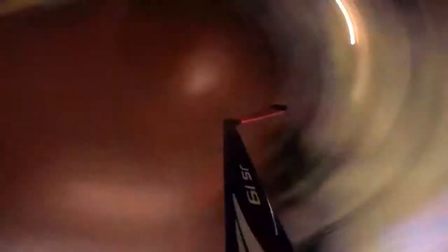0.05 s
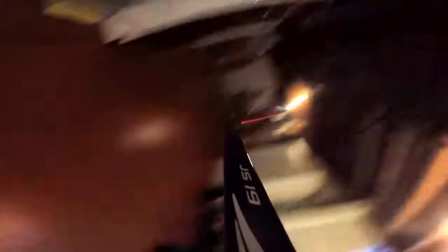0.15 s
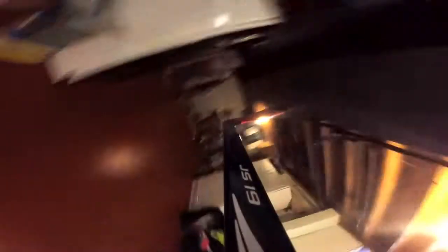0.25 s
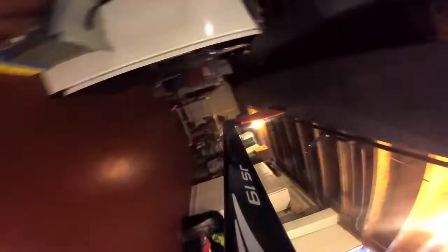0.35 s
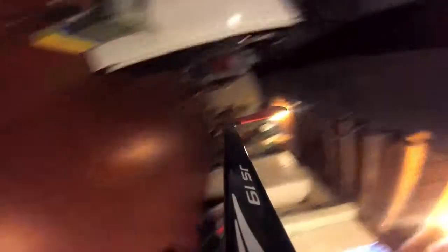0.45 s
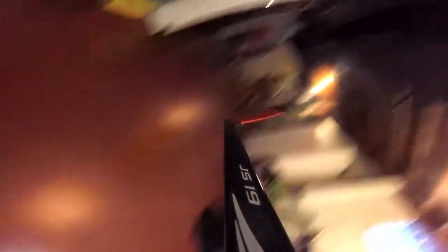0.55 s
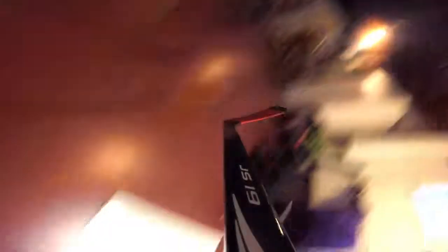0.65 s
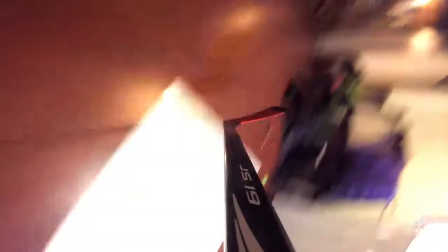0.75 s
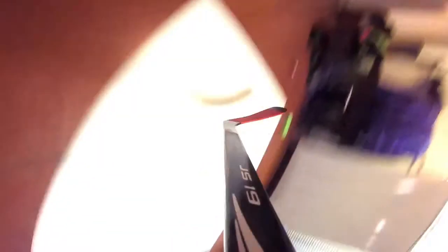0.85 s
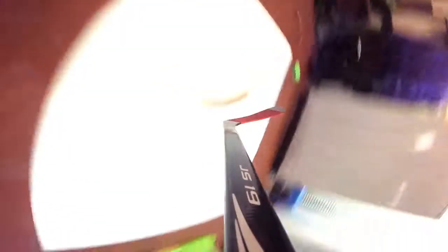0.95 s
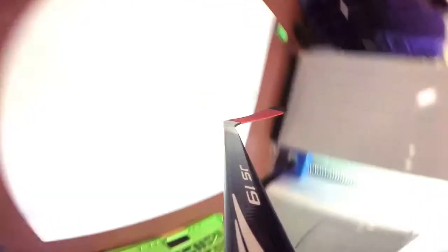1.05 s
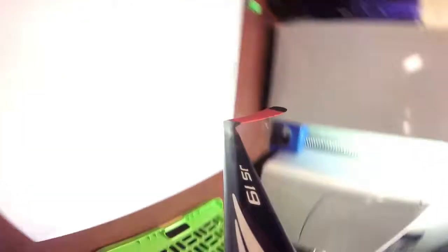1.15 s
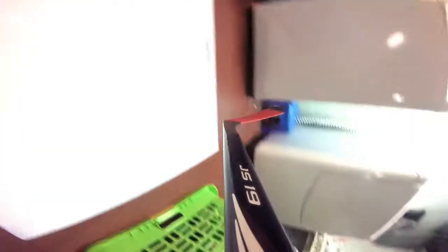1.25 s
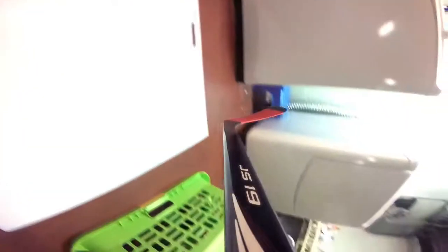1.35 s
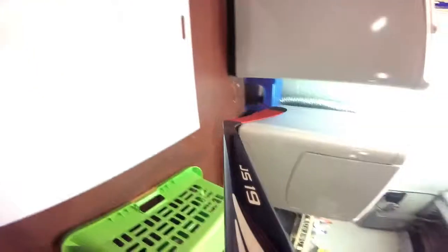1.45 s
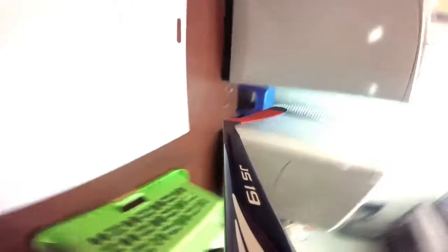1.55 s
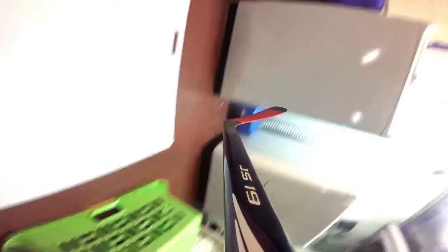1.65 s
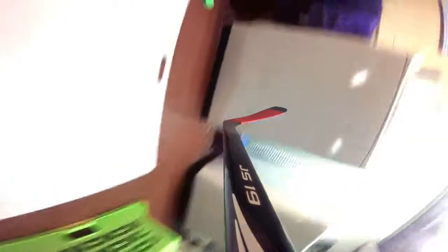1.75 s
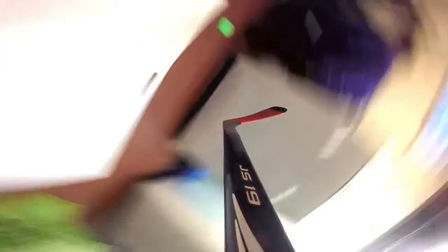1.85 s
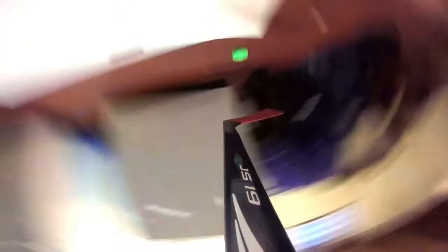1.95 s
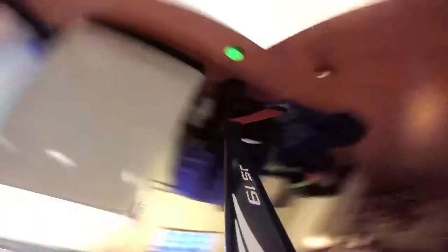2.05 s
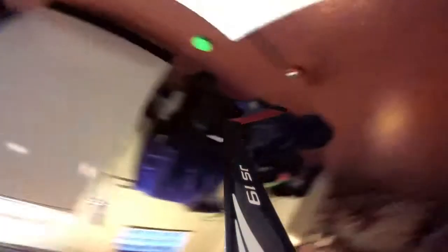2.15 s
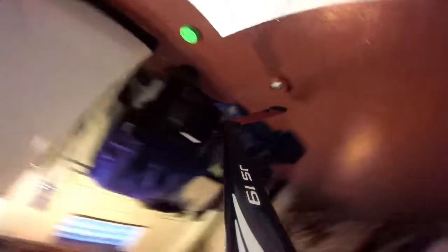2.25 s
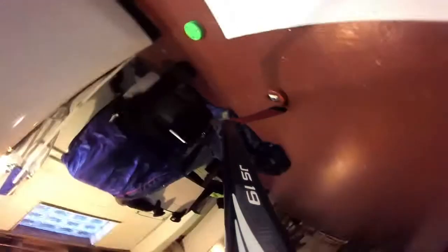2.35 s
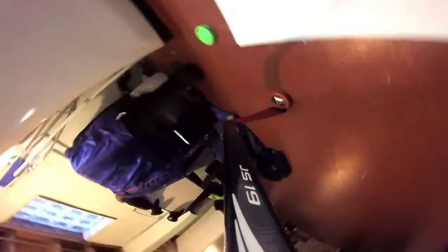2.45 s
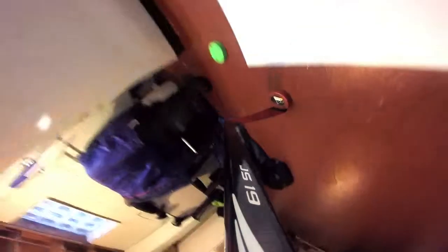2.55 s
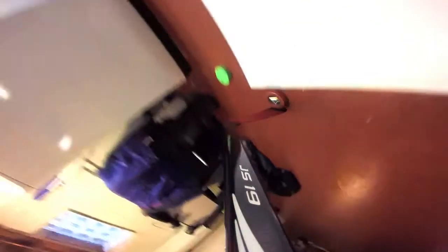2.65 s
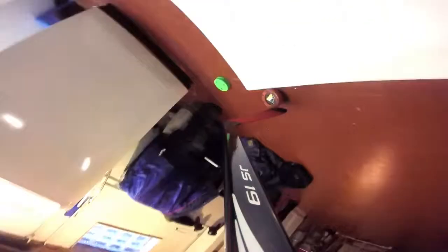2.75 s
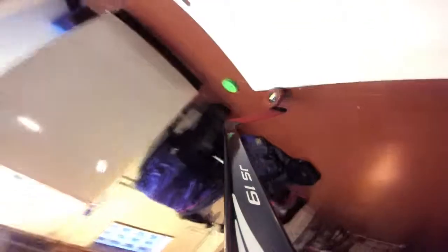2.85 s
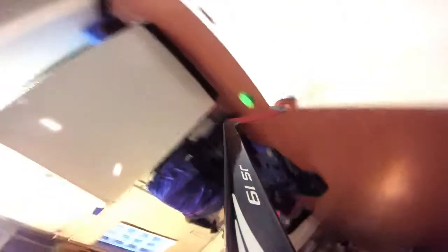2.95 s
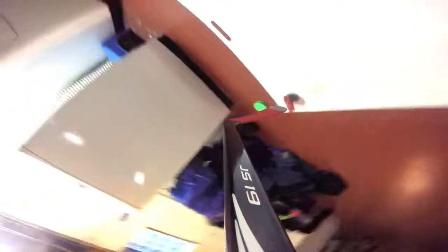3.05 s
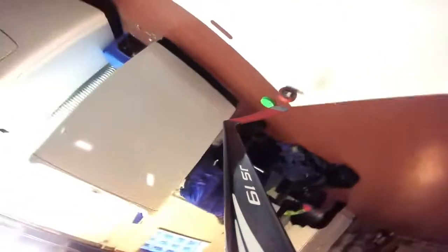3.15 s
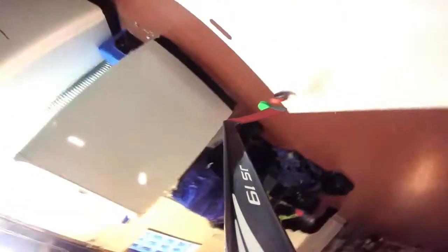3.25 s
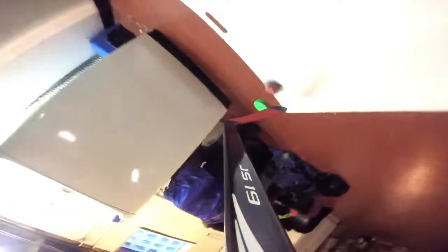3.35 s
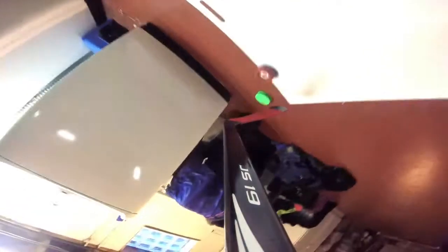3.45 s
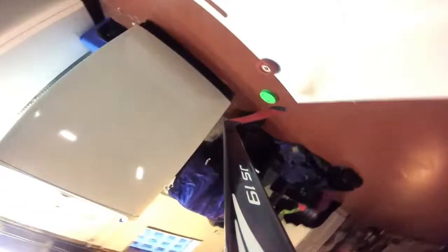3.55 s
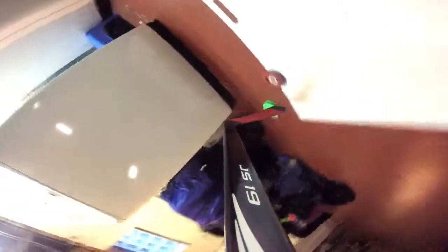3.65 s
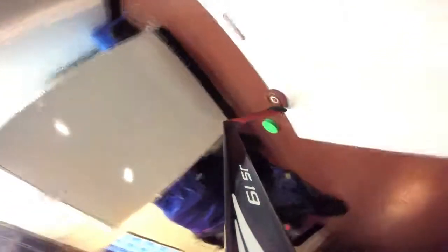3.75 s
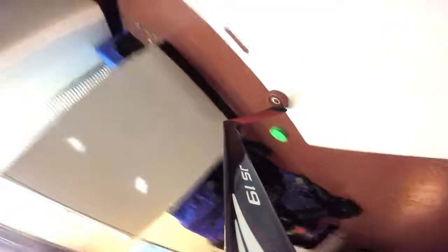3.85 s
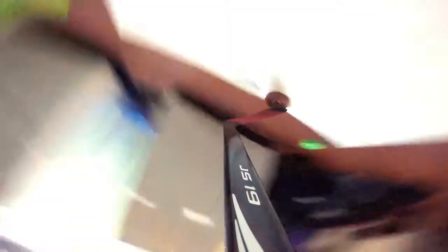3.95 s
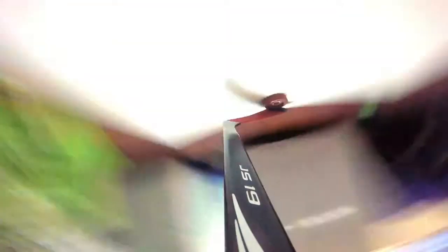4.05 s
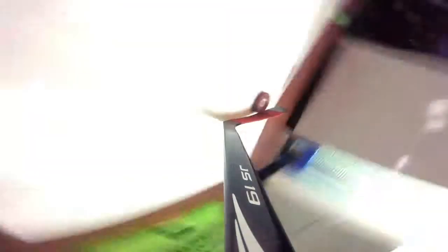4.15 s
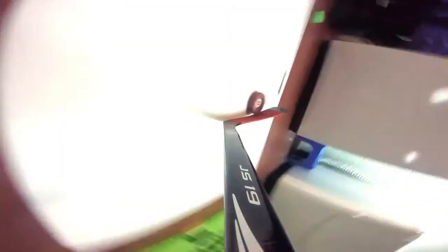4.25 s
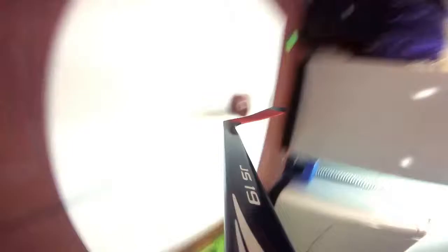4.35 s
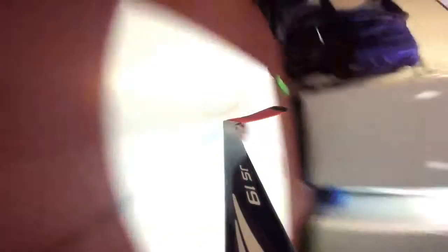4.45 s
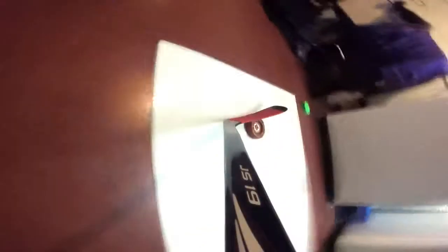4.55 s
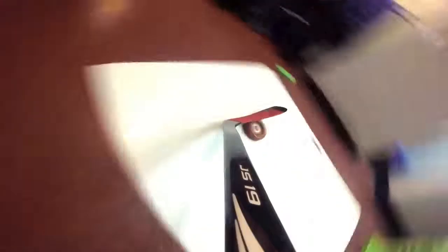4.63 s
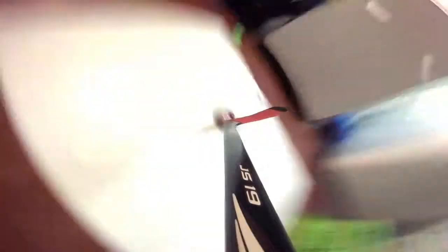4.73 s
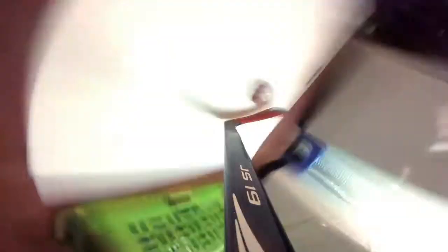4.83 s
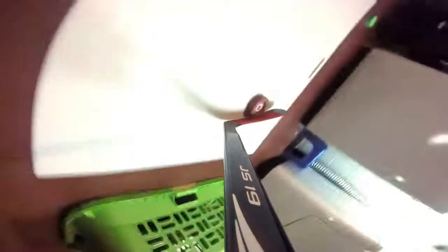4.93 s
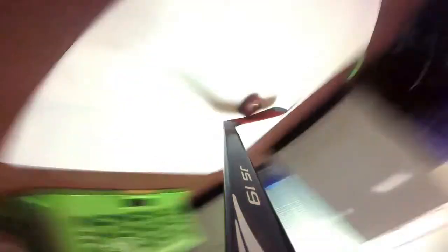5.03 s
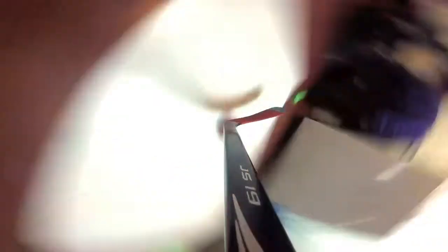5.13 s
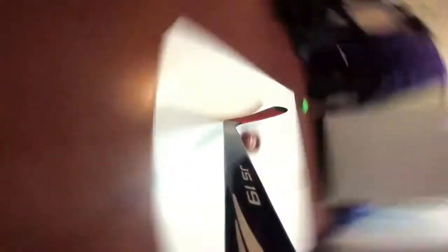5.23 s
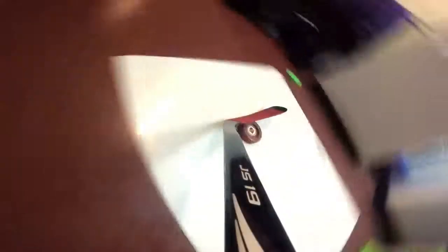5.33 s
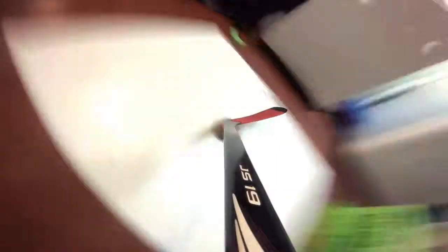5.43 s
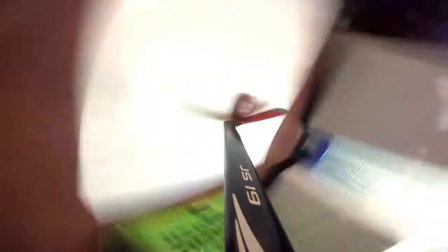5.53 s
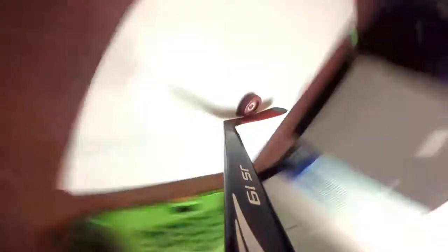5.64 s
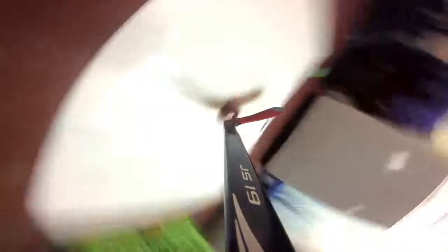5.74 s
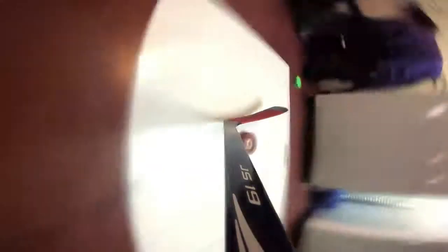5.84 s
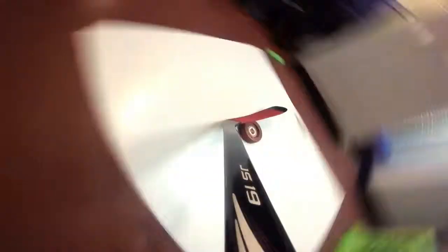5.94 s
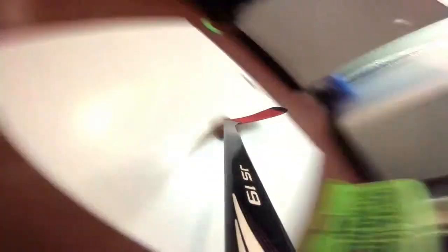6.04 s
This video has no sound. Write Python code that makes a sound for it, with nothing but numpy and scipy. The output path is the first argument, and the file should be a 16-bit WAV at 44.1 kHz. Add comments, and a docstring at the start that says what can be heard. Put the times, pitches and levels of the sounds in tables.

```python
"""A hockey stick dribbles a small hard ball on an indoor floor, heard by a microphone fixed to the shaft.
Each clack rings the blade and runs up the shaft as a bending wave; the hardest overload the microphone.
Once the blade judders along the floor, sticking and slipping. Lighter knocks ring in the room.
Underneath, the moving stick rumbles and rustles, and air buffets the microphone on the swings."""
import sys
import numpy as np
from scipy import signal
from scipy.fft import rfft, irfft
from scipy.io import wavfile

SR = 44100
rng = np.random.default_rng(int(sys.argv[2]) if len(sys.argv) > 2 else 0)


def to_wav(s):
    """Save 16-bit WAV."""
    ch = np.atleast_2d(s).T  # columns
    pcm = np.round(np.clip(ch, -1, 1) * 32767)  # PCM
    wavfile.write(sys.argv[1], SR, pcm.astype(np.int16))


N = 268569
TIME = np.arange(N) / SR
AGE = TIME[:SR // 2]  # seconds since a hit

# The blade hits ball or floor: (time [s], level [dB], place [0 heel to 1 toe], brightness [dB/octave],
# shaft thump send [dB], accent pitch [Hz], accent send [dB])
HITS = [(0.0015, -15, 1, 1.5, -15.5, 780, 3), (0.0095, -21, 0.75, 3.5, -22, 950, -3),
        (1.784, -45.5, 0.3, 6.5, -8, 950, 0), (1.834, -37, 0.6, 6, -6, 906, -4),
        (1.881, -39.5, 0.95, 0, 24, 1004, -6), (2.3496, 5.5, 0.65, 2.5, -8, 1487, -5.5),
        (2.4208, -7, 0.94, -2.5, -4.5, 1440, 1), (2.682, -2.5, 0.93, -2, -11, 1096, -6),
        (3.7519, 2, 0.55, -1, 2, 3040, -5.5), (3.785, -12.5, 0.71, -2.5, -0.5, 920, -5.5),
        (3.8371, -18.5, 0.99, -1, -28, 950, 3), (3.865, -34, 0.6, 1.5, 1, 2010, 9),
        (3.882, -33.5, 0.74, 3.5, -21.5, 1970, 9), (4.058, -29.5, 0, 8.5, 9.5, 1460, 10),
        (4.089, -8, 0.62, 2, 4.5, 3140, -1.5), (4.098, -7.5, 0.56, 1, 10, 1100, -7),
        (4.137, -6.5, 0.38, -3, 10, 950, -12), (4.1609, 2.5, 0.5, -3.5, -2.5, 936, -2),
        (4.172, -15, 0, 1, -2.5, 621, 4), (4.343, -37.5, 0.83, 1, 20.5, 1090, 8.5),
        (4.4287, -32, 0.5, -6, -16.5, 1306, 5), (4.536, 8.5, 0.55, 1, -8, 1160, -13),
        (4.554, -4, 0.48, -1, -16, 850, -4), (4.692, -43.5, 0.83, -4.5, 5, 976, 0),
        (4.872, 2, 0.36, 3.5, -3, 2670, 1), (4.927, 6, 0.68, 3.5, -13, 1310, -9.5),
        (5.071, -46.5, 0.76, -4.5, 3, 900, -7), (5.227, 5.5, 0.29, 2.5, -7, 2282, -3),
        (5.3041, 1, 0.69, 4.5, -13, 827, 7), (5.441, -40.5, 0.67, -7, 18.5, 1423, 2.5),
        (5.537, -16.5, 0.58, -7, 14.5, 1344, -13.5), (5.564, -9, 0.22, -1, -19, 913, -0.5),
        (5.569, 0, 0, 3.5, -13, 2313, 2), (5.632, -35.5, 0.5, -2.5, -5, 1350, -21),
        (5.72, -50.5, 0.5, -8.5, 12.5, 912, -0.5), (5.8694, 2.5, 0.19, -0.5, -4, 1185, 0),
        (5.9263, 1, 0.73, 4.5, -19, 813, 6.5), (6.022, -37, 0.42, -3.5, 19.5, 1410, -11)]
def dribble(accent_t60=0.022, rebounds=3, first_gap_s=0.011, gap_shrink=0.8, gap_scatter=0.28):
    """Each hit rings the blade with one accented pitch and shakes the shaft; the ball rattles after it."""
    blade, shaft = np.zeros(N), np.zeros(N)
    jitters = rng.uniform(-1.1, 1, (len(HITS), rebounds))
    for (s, db, place, bright_db, thump_db, accent_hz, accent_db), jitter in zip(HITS, jitters):
        ring = 0.73 * 2 ** (-db / 25.5)  # a firm hit damps the blade; 25.5 dB softer rings twice as long
        accent = amp(accent_db) * mode(accent_hz, accent_t60 * ring)
        add(blade, s, amp(db) * (clack(place, bright_db, ring) + accent))
        add(shaft, s, amp(db + thump_db) * shaft_flex(place))
        # the ball has rolled towards the toe: dull rebounds, each softer and mostly sooner than the last
        rebound = clack(place=0.85, bright_db=bright_db - 11.5, ring=0.81)
        gaps = first_gap_s * gap_shrink ** np.arange(rebounds) * (1 + gap_scatter * jitter)
        for k, delay in enumerate(np.cumsum(gaps)):
            add(blade, s + delay, amp(db - 21.5 - 6 * k) * rebound)
    return low_cut(blade) + low_cut(shaft, hz=61)


# The tone of the clack, the blade's modes and, at 830 Hz, the ball's ring: (pitch [Hz], heel level [dB], toe
# level [dB], base t60 [s])
CLACK_MODES = [(610.6, -9, -21.5, 0.065), (830, -33, -9, 0.01), (838, -25.5, -19.5, 0.062),
               (884.4, -22, -1, 0.042), (1013, -6, -9, 0.03), (1318, -0.5, -13, 0.02),
               (1568, -4, -16.5, 0.022), (1964, -14.5, -10.5, 0.02), (2410, -9.5, -25, 0.014),
               (2877, -8, -11, 0.011), (3324, -20, -13, 0.02), (4330, -27.5, -23, 0.0088),
               (5640, -41.5, -30.5, 0.02)]
# EQ of the contact crack: (frequency [Hz], level [dB])
CRACK_EQ = [(150, -16.5), (400, -16.5), (800, -4), (1500, 7.5), (3200, -2.5), (4200, -3.5), (6500, -14),
            (7500, -18.5), (9000, -17), (11000, -32), (15000, -36.5)]
# EQ of the buzzing tail: (frequency [Hz], level [dB])
BUZZ_EQ = [(150, -7.5), (380, -18), (700, -4.5), (1200, -6.5), (2100, -5), (3200, -8.5), (4500, -11),
           (6500, -11), (10000, -24.5), (14000, -46.5)]
def clack(place, bright_db, ring, crack_t60=0.048, crack_db=-10, rise_s=0.00055):
    """Blade modes and the ball's ring, weighted by the place struck, a contact crack and a buzz; ring stretches
    the first two."""
    tone = sum(amp(heel_db + place * (toe_db - heel_db)) * tilt(hz, bright_db) * mode(hz, t60 * ring)
               for hz, heel_db, toe_db, t60 in CLACK_MODES)
    burst = amp(crack_db) * noise(CRACK_EQ, len(AGE), bright_db)
    body = signal.sosfiltfilt(signal.butter(2, 3800, fs=SR, output="sos"), burst)
    treble = amp(2) * (burst - body)
    crack = body * fade(crack_t60 * ring) + treble * fade(0.65 * crack_t60 * ring)  # treble dies first
    # the crowded upper modes leave a weak, chattering buzz
    buzz = amp(-35) * fade(t60=0.11) * chatter(len(AGE)) * noise(BUZZ_EQ, len(AGE), slope_db=-0.4)
    return amp(4) * tone + attack(rise_s) * (crack + buzz)


# The low thump, the shaft's modes: (pitch [Hz], heel level [dB], toe level [dB], t60 [s])
SHAFT_MODES = [(64, -40, -39, 0.1), (109.7, -22, -20.5, 0.11), (147, -25, -28, 0.093),
               (184.4, -21.5, -42.5, .16), (244, -29.5, -28.5, 0.087)]
def shaft_flex(place):
    """The whole shaft bends slowly after a hit at this place on the blade."""
    return sum(amp(heel_db + place * (toe_db - heel_db)) * mode(hz, t60)
               for hz, heel_db, toe_db, t60 in SHAFT_MODES)


# The blade is pushed over the floor: (start [s], end [s], level [dB])
PUSHES = [(2.393, 2.421, -25), (2.471, 2.679, -15)]
# Hard catches that punctuate the drag: (time [s], level [dB])
HARD_CATCHES = [(2.4705, -18.5), (2.4928, -11.5), (2.5255, -10.5), (2.6054, -15.5), (2.6242, -8.5),
                (2.651, -13.5)]
# EQ of the floor rasp: (frequency [Hz], level [dB])
RASP_EQ = [(88, -54.5), (150, -3), (371, -31.5), (649, -25), (742, -30), (850, -29.5), (1160, 3.5),
           (1380, -6.5), (2020, -5.5), (2360, -34), (3030, -24), (4210, -27), (5510, -54), (8410, -47.5),
           (15000, -55)]
def drag(slips_per_s=170, slip_scatter_db=4, snap_back_s=0.0055, snap_back_db=-6):
    """The blade sticks and slips: small uneven slips ring its modes and rasp, hard catches snap twice."""
    pressure = sum(amp(db) * held(start, end, rise_db_per_s=8997.5, fall_db_per_s=1499.5)
                   for start, end, db in PUSHES)
    rasp = amp(-14) * pressure * chatter(N) * noise(RASP_EQ, N)
    # each slip grips at one of six places near the toe and ticks
    ticks = [clack(place, bright_db=-1.5, ring=1.87, crack_t60=0.0096, crack_db=-3)
             for place in np.linspace(0.65, 1, 6)]
    judder = np.zeros(N)
    for start, end, db in PUSHES:
        s = start
        for gap, size, which in rng.random((80, 3)):
            if s < end:
                slip_db = db + 1 + slip_scatter_db * (2 * size - 1.5)
                add(judder, s, amp(slip_db) * ticks[int(which * len(ticks))])
            s += 2 * gap / slips_per_s
    for s, db in HARD_CATCHES:
        for delay, snap_db in (0, 0), (snap_back_s, snap_back_db):  # the bent blade snaps back
            catch = clack(place=0.7, bright_db=-2.5, ring=0.96, crack_t60=0.017, crack_db=-1)
            add(judder, s + delay, amp(db + snap_db + 3) * catch)
    return rasp + low_cut(judder)


# Light knocks and scuffs: (time [s], level [dB], brightness [dB/octave], t60 [s], room send [dB])
LIGHT_KNOCKS = [(0.926, -39.5, -3.5, 0.34, -3), (1.141, -41, -18, 0.062, 8.5), (2.925, -62, -9, 0.038, -2),
                (3.003, -56, -8, 0.17, 0.5), (3.386, -33, -5, .04, 7.5), (3.397, -25.5, -3.5, 0.067, -2.5),
                (3.498, -22, -0.5, 0.033, 4.5), (3.55, -36, -8.5, 0.056, -17.5),
                (3.573, -31.5, -5, 0.033, 4.5), (3.627, -35.5, -8, 0.05, -10), (3.989, -36, 0.5, 0.36, -26),
                (4.24, -37.5, -5.5, 0.065, -7), (4.432, -34.5, -4.5, 0.02, 7.5)]
# EQ of a knock: (frequency [Hz], level [dB])
KNOCK_EQ = [(80, -16), (350, -4.5), (600, -0.5), (900, -5.5), (1300, 1.5), (2000, 4), (2600, -1),
            (5000, -7.5), (6500, -11), (10000, -25.5), (15000, -44.5)]
def knocks(ping_hz=1875, ping_t60=0.049):
    """Rough knocks with one faint pitch, heard through the air; gives the direct sound and a room send."""
    direct, send = np.zeros(N), np.zeros(N)
    for s, db, bright_db, t60, send_db in LIGHT_KNOCKS:
        knock = amp(db) * attack(rise_s=0.0004) * fade(t60) * noise(KNOCK_EQ, len(AGE), bright_db)
        ping = amp(db - 4) * tilt(ping_hz, bright_db) * mode(ping_hz, ping_t60)
        add(direct, s, knock + ping)
        add(send, s, amp(send_db) * knock)
    return direct, send


# EQ of the reverb tail: (frequency [Hz], level [dB])
ROOM_EQ = [(100, 0), (500, 0.5), (1000, -0.5), (2100, 5), (3000, -6), (6500, -3), (12000, 10)]
def room(send, t60=0.36):
    """The short, diffuse echo of a furnished room."""
    tail = noise(ROOM_EQ, len(AGE)) * fade(t60) * attack(rise_s=0.0047)
    return signal.fftconvolve(send, tail / np.linalg.norm(tail))[:N]


# Sweeps and slow carries of the stick: (start [s], end [s], rumble [dB], rustle [dB], release [dB/s])
SWINGS = [(0, .1, -39.5, -52, 152), (.59, .66, -34, -54.5, 62), (0.914, 2.3, -58.5, -61, 97.5),
          (1.828, 1.93, -58.5, -53.5, 48), (2.376, 2.71, -48, -68, 217), (3.327, 6.089, -73, -66, 106),
          (3.52, 3.58, -72.5, -57.5, 56), (3.975, 4.2, -52.5, -54, 71.5), (4.66, 5.028, -52.5, -62.5, 155),
          (5.32, 5.694, -51.5, -64.5, 66), (5.98, 6.09, -52, -71, 100)]
# EQ of the grip and shaft rumble: (frequency [Hz], level [dB])
HANDLING_EQ = [(20, -13), (60, -2), (110, 3), (180, -3.5), (260, -10), (450, -23), (900, -34)]
# EQ of air buffeting the microphone: (frequency [Hz], level [dB])
WIND_EQ = [(12, -34.5), (20, 9), (60, 1.5), (102, -6.5), (148, -8.5), (429, -24.5), (605, -19),
           (1200, -58.5), (1560, -77.5), (2640, -120)]
# EQ of the rustle: (frequency [Hz], level [dB])
RUSTLE_EQ = [(200, 4.5), (500, 3.5), (1000, 0.5), (2100, -1), (3000, -5.5), (4500, -10), (6500, -11.5),
             (8000, -18), (12000, -25), (15000, -34.5)]
def swing(recoil_delay_s=0.08, recoil_width_s=0.012, gust_pivot_db=-36, gust_growth=1.3):
    """The moving stick rumbles and rustles; in a fast swing or a recoil, air buffets the microphone."""
    rumble_gain, rustle_gain = amp(-71), amp(-74)  # the bed while the stick is still
    for start, end, rumble_db, rustle_db, fall_db_per_s in SWINGS:
        speed = held(start, end, rise_db_per_s=169, fall_db_per_s=fall_db_per_s)
        rumble_gain = np.hypot(rumble_gain, amp(rumble_db) * speed)
        rustle_gain = np.hypot(rustle_gain, amp(rustle_db) * speed)
    recoil = np.zeros(N)
    jolt = np.exp(-0.5 * ((AGE - recoil_delay_s) / recoil_width_s) ** 2)
    for s, db, *_ in HITS:  # the arms take up each hit a moment later
        add(recoil, s, amp(db) * jolt)
    handling = amp(-3) * rumble_gain * noise(HANDLING_EQ, N)
    # buffeting grows more steeply with speed than the handling noise
    gust = amp(gust_pivot_db) * (rumble_gain / amp(gust_pivot_db)) ** gust_growth
    wind = np.hypot(gust, amp(-52.5) * recoil) * noise(WIND_EQ, N)
    grain = amp(1.5 * noise([(5, 7), (60, -4.5), (200, -12.5)], N))  # the rustle flickers by 1.5 dB rms
    rustle = np.hypot(rustle_gain, amp(-67.5) * recoil) * grain * noise(RUSTLE_EQ, N)
    return handling + wind + rustle


def mode(hz, t60, travel_at_1khz_s=0.0007, contact_s=0.00068):
    """A resonance that swells during contact; bending waves carry highs faster, so lows arrive last."""
    t = np.maximum(AGE - travel_at_1khz_s * np.sqrt(1000 / hz), 0)
    envelope = (1 - np.exp(-t / contact_s)) * np.exp(-np.log(1000) * t / t60)
    detune = 1 + 0.015 * rng.standard_normal()
    return envelope * np.sin(2 * np.pi * hz * detune * t)


def low_cut(x, hz=430):
    """Cut away what lies below hz."""
    return signal.sosfilt(signal.butter(2, hz, "high", fs=SR, output="sos"), x)


def noise(eq, size, slope_db=0):
    """Noise through an EQ of (frequency [Hz], level [dB]) points and a tilt; rms 1."""
    hz, db = np.transpose(eq)
    f = np.maximum(np.arange(size // 2 + 1) * SR / size, 1)
    curve = amp(np.interp(np.log(f), np.log(hz), db))
    skirts = np.minimum(f / hz[0], 1) * np.minimum(hz[-1] / f, 1) ** 2
    shaped = irfft(rfft(rng.standard_normal(size)) * curve * skirts * tilt(f, slope_db), size)
    return shaped / np.std(shaped)


def chatter(size, depth_db=3.5):
    """A gain that flutters every few milliseconds; rms 1."""
    gain = amp(depth_db * noise([(40, 0), (250, 0), (600, -12)], size))
    return gain / np.sqrt(np.mean(gain ** 2))


def tilt(hz, slope_db):
    """Gain of a tilt EQ in dB per octave around 1 kHz, flat below 500 Hz and above 6 kHz."""
    return amp(slope_db * np.log2(np.clip(hz, 500, 6000) / 1000))


def held(start, end, rise_db_per_s, fall_db_per_s):
    """Gain that swells up to start, holds at 1 and dies away after end."""
    return amp(-rise_db_per_s * np.maximum(start - TIME, 0) - fall_db_per_s * np.maximum(TIME - end, 0))


def attack(rise_s):
    """Rise from 0 to 1 with time constant rise_s."""
    return 1 - np.exp(-AGE / rise_s)


def fade(t60):
    """Decay by 60 dB in t60 seconds."""
    return np.exp(-np.log(1000) * AGE / t60)


def amp(db):
    """Decibels to gain."""
    return 10 ** (np.asarray(db) / 20)


def add(track, s, sound):
    """Mix a sound in at time s."""
    i = max(int(s * SR), 0)
    track[i:i + len(sound)] += sound[:N - i]


def scene(stick_send_db=-30):
    """The stick reaches the microphone through its shaft, far louder than its echo in the room."""
    stick = dribble() + drag()
    direct_knocks, knock_send = knocks()
    reverb = room(amp(stick_send_db) * stick + knock_send)
    return (stick + direct_knocks + reverb + swing())[None]


def record(dry, high_cut_hz=15300):
    """The hardest clacks clip at full scale, then a steep filter cuts the top."""
    clipped = dry / (1 + dry ** 16) ** (1 / 16)
    return signal.sosfilt(signal.ellip(8, 0.2, 70, high_cut_hz, fs=SR, output="sos"), clipped)


dry = scene()
out = record(dry)
to_wav(out)
```